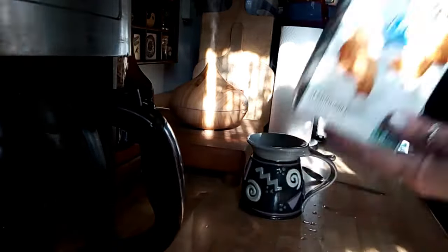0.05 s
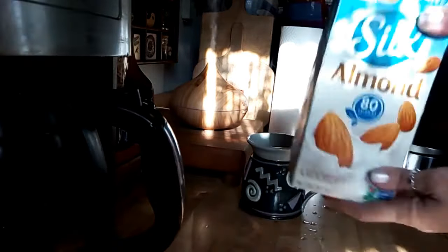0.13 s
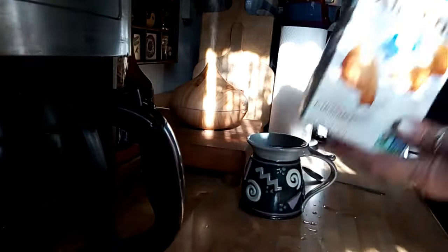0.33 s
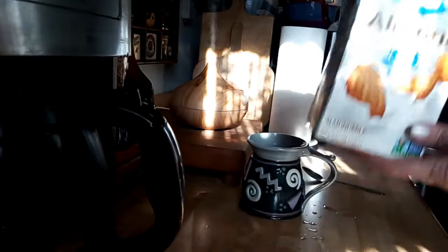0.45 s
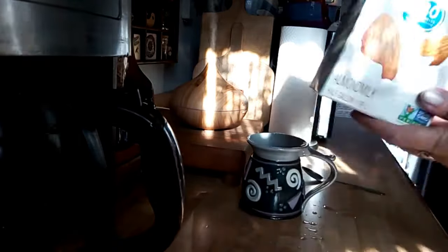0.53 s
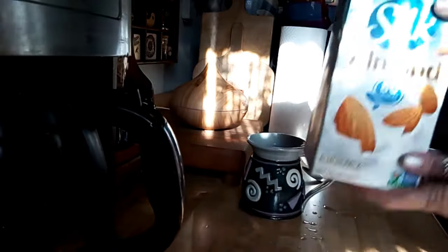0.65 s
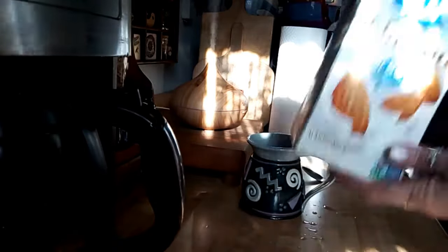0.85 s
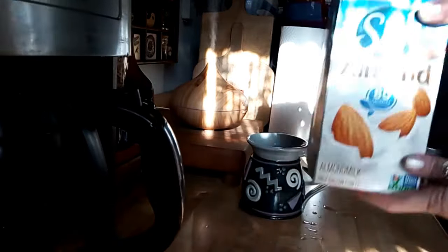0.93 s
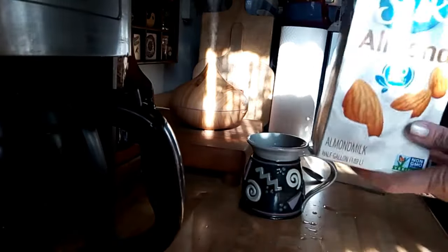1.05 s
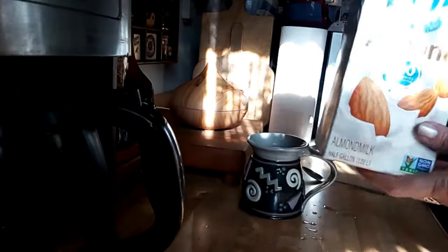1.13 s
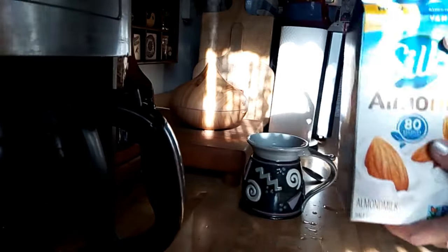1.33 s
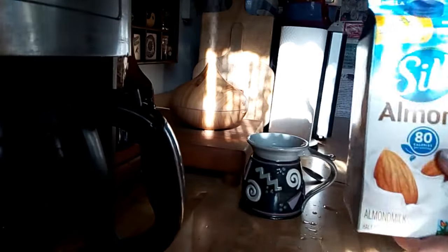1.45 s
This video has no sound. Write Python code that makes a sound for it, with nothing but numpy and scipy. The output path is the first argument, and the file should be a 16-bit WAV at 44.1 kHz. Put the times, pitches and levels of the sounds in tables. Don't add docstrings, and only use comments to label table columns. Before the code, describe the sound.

Milk sloshes, bubbles and thuds inside a hollow card carton during a brief close shake

```python
import sys
import numpy as np
from scipy import signal
from scipy.fft import rfft, irfft, next_fast_len
from scipy.io import wavfile

SR = 44100
rng = np.random.default_rng(int(sys.argv[2]) if len(sys.argv) > 2 else 0)


def pcm_store(signal):
    levels = np.round(np.clip(np.atleast_2d(signal), -1, 1) * 32767)
    wavfile.write(sys.argv[1], SR, levels.astype(np.int16).T)


def voltage_ratio(decibels):
    exponent = np.asarray(decibels, float) / 20
    return 10 ** exponent


N = 66150

# f/Hz, level/dB
AIR_COLOUR = [(35, -55), (110, 3.5), (165, -9.5), (250, -2.5), (500, -7.5), (1100, -16.5), (2800, -23.5),
              (6500, -22)]
# f/Hz, level/dB
FRIDGE_HUM = [(58.5, -68.5), (117, -65.5), (236, -69.5), (465, -70.5)]
# t/s, rise/s, hold/s, spray level/dB, gurgle level/dB
SLOSHES = [(0.028, 0.0076, 0.012, -62, -95), (0.156, 0.0017, .004, -58, -84), (0.17, .005, 0.011, -63, -77),
           (0.214, 0.0097, 0.0066, -41, -41), (0.273, 0.031, 0.04, -54.5, -50.5),
           (0.368, 0.0056, 0.018, -37.5, -36), (0.394, 0.0066, 0.037, -36.5, -39.5),
           (0.462, 0.031, 0.012, -33.5, -40), (0.502, 0.013, 0.027, -39.5, -36),
           (0.546, 0.0085, 0.048, -47, -41.5), (0.6273, 0.001, 0.032, -39, -41.5),
           (0.658, 0.011, 0.016, -46, -40), (0.695, 0.034, 0.073, -44.5, -41),
           (0.782, 0.012, 0.026, -46.5, -48.5), (0.819, 0.009, 0.045, -52.5, -51),
           (0.864, 0.0076, 0.0055, -37.5, -44), (0.88, 0.0074, 0.014, -34.5, -37),
           (0.902, 0.0059, 0.0045, -31, -41), (0.928, 0.027, 0.061, -47, -44),
           (1, 0.019, 0.027, -47.5, -40), (1.036, 0.0069, 0.039, -51, -46.5),
           (1.089, 0.0084, 0.036, -58.5, -55), (1.137, 0.014, 0.034, -59, -56.5),
           (1.204, 0.0025, 0.02, -53, -55), (1.23, 0.0051, 0.023, -57, -50.5),
           (1.268, .01, .02, -57.5, -72), (1.297, 0.013, 0.014, -52, -57.5),
           (1.349, 0.0036, 0.022, -60, -85)]
# f/Hz, level per Hz/dB
SPRAY_COLOUR = [(1200, -6), (2200, -1), (4000, -1.5), (6500, 2.5), (8000, -2.5), (10000, -0.5),
                (13500, -17), (16000, -10.5)]
# f/Hz, level per Hz/dB
GURGLE_COLOUR = [(150, -9), (300, 2.5), (550, -4), (800, -4), (1500, -3), (2200, -4.5), (3500, -10),
                 (5000, -22)]
# t/s, peak level/dB, low share/dB
TICKS = [(0.0344, -76, 7.5), (0.0464, -77, 5), (0.0564, -78, 22), (0.156, -45, 5), (0.179, -60, 9),
         (0.219, -37, 16), (0.293, -49, 18), (0.3738, -34, 7), (0.404, -28, 14.5), (0.4305, -34, -4),
         (0.4783, -35, 8), (0.6164, -49, 6), (0.6323, -45, 12), (0.686, -42, 12), (0.7264, -51, 14),
         (0.8264, -58.5, 10), (0.8708, -31, -7), (0.9108, -27.5, 10), (0.942, -40, 5), (1.0394, -53, -1),
         (1.1794, -54, -4), (1.208, -68, 30), (1.229, -45, 4), (1.3294, -55, 0)]
POP_TIMES = [.157, .157, .321, .352, .38, .39, .397, .511, .512, .563, .746, .773, .888, .892, .897, .909,
             1.028, 1.158, 1.243, 1.252, 1.259, 1.325, .371, .632, .568, 1.165, 1.21, 1.208, 1.24, .226,
             .234, 1.312, 1.257, 1.356, .519, .527, .535, .899, .889, .297, .338, .489]
# f/Hz, level/dB, length/cycles
POPS = [(3120, -40.5, 26), (7100, -33.5, 17), (4960, -31, 35), (4000, -44, 34), (2050, -10.5, 21),
        (2040, -14, 15.5), (1960, -18, 14), (709, -18.5, 19), (1220, -35, 20), (1320, -22.5, 22),
        (1466, -28.5, 42), (1420, -24.5, 22), (2170, -17.5, 22), (1590, -12.5, 11.6), (3180, -18, 25),
        (7140, -18, 28), (800, -29, 29), (1430, -37, 22.3), (2390, -40, 36), (1550, -45, 25),
        (748, -40, 32), (458, -54, 14), (5080, -26, 51), (1970, -22.5, 19), (1760, -24.5, 26),
        (1510, -37, 23), (1800, -37.5, 23), (6460, -42, 53), (1400, -41, 25), (870, -33, 11),
        (1260, -48, 11), (524, -41, 18), (2580, -48, 25), (6360, -44.5, 59), (703, -31.5, 13),
        (850, -26, 11), (705, -28, 14), (1270, -26.5, 21), (660, -27, 12), (1760, -38, 27), (1490, -34, 20),
        (6100, -25, 45)]
# t/s, peak level/dB, f/Hz
THUDS = [(.225, -30, 319), (.376, -36, 333), (.384, -35, 287), (0.404, -33.5, 275), (0.434, -28.5, 286),
         (.445, -26.5, 296), (.481, -25.5, 281), (0.493, -31.5, 360), (0.511, -31, 417), (0.522, -26, 306),
         (0.534, -29, 244), (0.564, -34.5, 332), (.579, -35, 274), (0.653, -38, 320), (0.669, -38, 306),
         (0.687, -45, 310), (0.696, -41, 327), (.726, -35, 296), (0.733, -33.5, 340), (0.749, -35, 400),
         (.772, -35, 326), (0.781, -35, 287), (0.811, -35.5, 315), (.915, -49, 290), (0.977, -34.5, 260),
         (1.006, -30, 390), (1.02, -29.5, 266), (1.041, -34.5, 345), (1.064, -36, 324), (1.101, -41.5, 370),
         (1.147, -50, 318), (1.177, -47.5, 280), (1.19, -46.5, 252), (1.244, -41.5, 373),
         (1.261, -41.5, 388), (1.289, -41, 290), (1.327, -43.5, 413), (1.375, -52.5, 460),
         (1.413, -57, 255), (.288, -46, 323), (0.32, -49, 291), (0.473, -34, 328), (.612, -42, 283)]
# t/s, peak level/dB, f/Hz
RINGS = [
    (0.71, -29.5, 310),
    (.9026, -30.5, 278),
    (.238, -44, 455),
]
# t/s, peak level/dB, f/Hz
PUSHES = [
    (.238, -45, 116),
    (.425, -46.5, 125),
    (.488, -36, 102),
    (.76, -41, 125),
    (.8, -40, 133),
    (1.035, -41, 120),
]
# f/Hz, level/dB
MICROPHONE = [(20, -5), (55, 0.02), (7300, -0.16), (8300, -9), (10500, -23.5), (13700, -29), (14700, -7.5),
              (15600, -18)]

AIR_DB = -57
SPRAY_FALL_DB_S, GURGLE_FALL_DB_S = 468, 457
DROPS_PER_S, DROP_SHARE = 7600, 0.65
SLAPS_PER_S, SLAP_SHARE = 900, 0.64
BUBBLES_PER_S, BUBBLE_CYCLES, BUBBLE_DB = 1500, 7.2, -5
TICK_DB, TICK_LOW_DB, TICK_T60_S = 9.5, -9.5, 0.02
POP_RISE = 0.065
THUD_RISE_S, THUD_FALL_S, THUD_DB = 0.0021, 0.0041, -1
OVERTONE, OVERTONE_DB = 2.27, -11.5
RING_RISE_S, RING_FALL_S = 0.0058, 0.0064
PUSH_RISE_S, PUSH_FALL_S = 0.004, 0.012
KITCHEN_T60_S, WALL_CUT_HZ, KITCHEN_DB = 0.28, 3600, -19
SELF_NOISE_DB, CUTOFF_HZ = -78.5, 15620


def rms_one(x):
    return x / np.sqrt(np.mean(x ** 2) + 1e-20)


def at_hz(points, hz):
    table = np.array(points)
    return np.interp(np.log(hz), np.log(table[:, 0]), table[:, 1], left=-45)


def drift(rate):
    r = np.exp(-80 * np.pi * rate / SR)
    noise = rng.standard_normal(N // 40 + 2002)
    slow = signal.lfilter([1], [1, -2 * r, r * r], noise)[2000:]
    return np.interp(np.arange(N) / 40, np.arange(len(slow)), rms_one(slow))


def coloured(sources, spectrum, patchy_db, rate):
    out = 0
    edges = 28 * 2 ** (np.arange(29) / 3)
    for k, (low, high) in enumerate(zip(edges, edges[1:])):
        bank = signal.butter(2, [low, high], "band", fs=SR, output="sos")
        band = signal.sosfilt(bank, sources[k % 2])
        level_db = at_hz(spectrum, np.sqrt(low * high)) + patchy_db * drift(rate)
        out = out + band * voltage_ratio(level_db)
    return rms_one(out)


def room_tone():
    t = np.arange(N) / SR
    hum = 0
    for hz, db in FRIDGE_HUM:
        waver = voltage_ratio(db + 3.5 + 2 * drift(24))
        hum = hum + waver * np.sin(2 * np.pi * hz * t + rng.uniform(0, 6.04))
    air = coloured(rng.standard_normal((2, N)), AIR_COLOUR, patchy_db=-0.5, rate=6.5)
    return hum + voltage_ratio(AIR_DB) * air


def slosh_envelope(fall_db_s, axis):
    t, power = np.arange(N) / SR, 0
    for row in SLOSHES:
        s, rise, hold = row[:3]
        swell = np.clip((t - s) / max(rise, 1e-3), 0, 1)
        drained_s = np.maximum(t - s - rise - hold, 0)
        power = power + (swell * voltage_ratio(row[axis] - fall_db_s * drained_s)) ** 2
    return np.sqrt(power)


def grains(rate, spread_db):
    sizes = voltage_ratio(spread_db * np.minimum(rng.exponential(1, N), 4)) * rng.choice([-1, 1], N)
    return sizes * (rng.random(N) < rate / SR)


def grainy_noise(rate, spread_db, share):
    smooth = np.sqrt(1 - share ** 2) * rng.standard_normal(N)
    return share * rms_one(grains(rate, spread_db)) + smooth


def spray():
    drops = [grainy_noise(DROPS_PER_S, 6.7, DROP_SHARE) for _ in range(2)]
    crackle = coloured(drops, SPRAY_COLOUR, patchy_db=1.5, rate=49)
    return slosh_envelope(SPRAY_FALL_DB_S, axis=3) * crackle


def ring(clicks, hz, t60):
    r, w = voltage_ratio(-60 / (t60 * SR)), 2 * np.pi * hz / SR
    return signal.lfilter([0, np.sin(w)], [1, -2 * r * np.cos(w), r * r], clicks + 1e-18)


def gurgle():
    born = grains(BUBBLES_PER_S, 1.45)
    dealt = rng.integers(0, 24, N)
    crowd = 0
    for k, hz in enumerate(np.geomspace(500, 4000, 24)):
        bubbles = ring(born * (dealt == k), hz, BUBBLE_CYCLES / hz)
        crowd = crowd + voltage_ratio(at_hz(GURGLE_COLOUR, hz)) * hz * bubbles
    crowd = rms_one(signal.lfilter([0.3], [1, -0.7], crowd))
    slaps = [grainy_noise(SLAPS_PER_S, 1.34, SLAP_SHARE) for _ in range(2)]
    rush = coloured(slaps, GURGLE_COLOUR, patchy_db=3.5, rate=35.6)
    return slosh_envelope(GURGLE_FALL_DB_S, axis=4) * (rush + voltage_ratio(BUBBLE_DB) * crowd)


def ticks():
    t = np.arange(SR // 20) / SR
    fade = voltage_ratio(-60 * t / TICK_T60_S)
    bright, dull = np.zeros((2, N + SR))
    for s, db, low_db in TICKS:
        burst = rng.standard_normal(len(t)) * fade
        spot = slice(int(s * SR), int(s * SR) + len(t))
        bright[spot] += voltage_ratio(db + TICK_DB) * burst
        dull[spot] += voltage_ratio(db + low_db + TICK_LOW_DB) * burst
    high = signal.butter(2, [8000, 13000], "band", fs=SR, output="sos")
    low = signal.butter(2, [2500, 8000], "band", fs=SR, output="sos")
    return (signal.sosfilt(high, bright) + signal.sosfilt(low, dull))[:N]


def pops():
    out, t = np.zeros(N + SR), np.arange(SR // 10) / SR
    for s, (hz, db, cycles) in zip(POP_TIMES, POPS):
        c = hz * t
        bend = 1 + POP_RISE * np.minimum(c / cycles, 1)
        tone = np.sin(2 * np.pi * c * bend) * (1 - np.exp(-c / 1.5))
        out[int(s * SR):int(s * SR) + len(t)] += voltage_ratio(db - 60 * c / cycles) * tone
    return out[:N]


def lumps(rows, rise_s, fall_s):
    t, out = np.arange(N) / SR, 0
    for s, db, hz in rows:
        turn = rng.uniform(0, 2 * np.pi)
        swell = np.exp(-((t - s) / np.where(t < s, rise_s, fall_s)) ** 2 / 2)
        out = out + voltage_ratio(db) * swell * np.cos(2 * np.pi * hz * (t - s) + turn)
    return out


def thuds():
    upper = [(s, db + OVERTONE_DB, hz * OVERTONE) for s, db, hz in THUDS]
    walls = lumps(THUDS, THUD_RISE_S, THUD_FALL_S) + lumps(upper, THUD_RISE_S / 2, THUD_FALL_S)
    rings = lumps(RINGS, RING_RISE_S, RING_FALL_S)
    pushes = lumps(PUSHES, PUSH_RISE_S, PUSH_FALL_S)
    return voltage_ratio(THUD_DB) * walls + rings + pushes


def kitchen(x):
    out, dull = np.zeros(N), np.exp(-2 * np.pi * WALL_CUT_HZ / SR)
    for k, lag in enumerate((rng.uniform(0.009, 0.03, 8) * SR).astype(int)):
        loop, state = x.copy(), [0.0]
        gain = voltage_ratio(-60 * lag / SR / KITCHEN_T60_S)
        for i in range(lag, N, lag):
            back, state = signal.lfilter([gain * (1 - dull)], [1, -dull], loop[i - lag:i], zi=state)
            loop[i:i + lag] += back[:N - i]
        out += (loop - x) * (-1) ** k
    return out


def scene():
    carton = spray() + gurgle() + thuds() + pops() + ticks()
    return (carton + voltage_ratio(KITCHEN_DB) * kitchen(carton) + room_tone())[None]


def low_pass(x):
    return signal.sosfilt(signal.butter(12, 16160, fs=SR, output="sos"), x)


def record(dry):
    size = next_fast_len(N + 4096)
    hz = np.arange(size // 2 + 1) * SR / size + 1
    self_noise = voltage_ratio(SELF_NOISE_DB) * rfft(rng.standard_normal(N), size)
    picked = rfft(dry, size) * voltage_ratio(at_hz(MICROPHONE, hz)) + self_noise
    mix = irfft(picked * (hz < CUTOFF_HZ), size)[:, :N]
    return low_pass(mix)


dry = scene()
out = record(dry)
pcm_store(out)
```